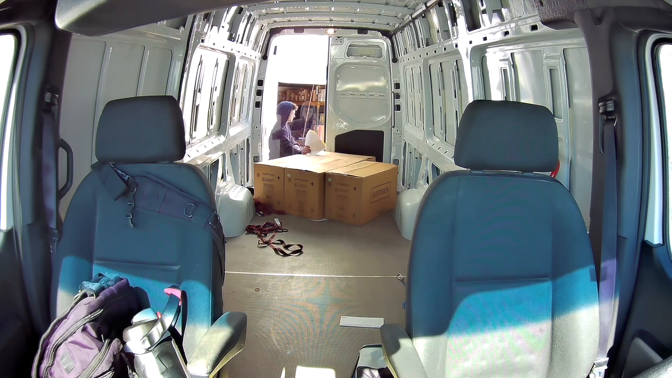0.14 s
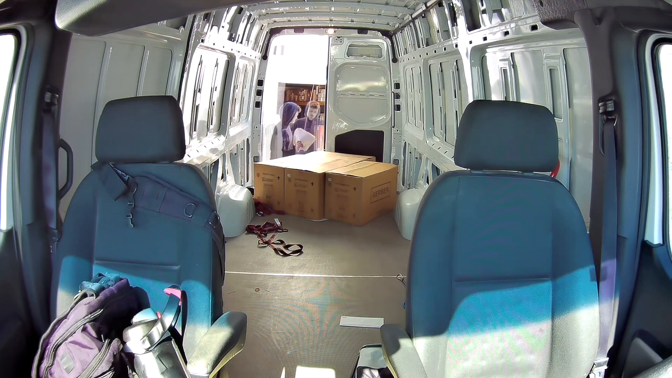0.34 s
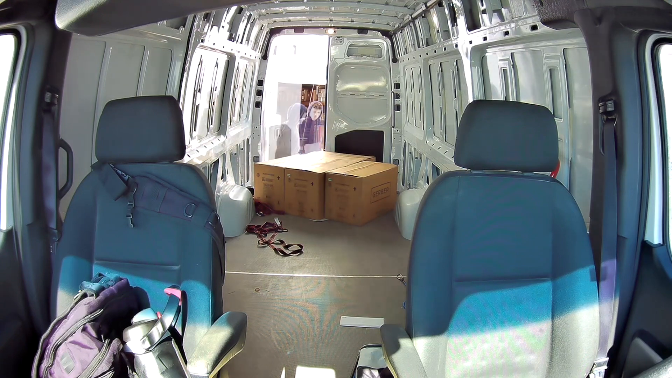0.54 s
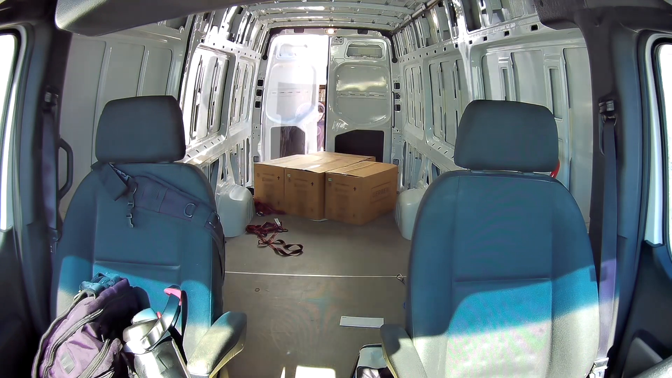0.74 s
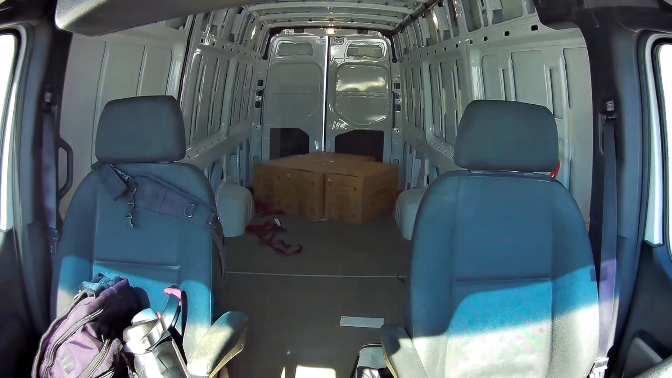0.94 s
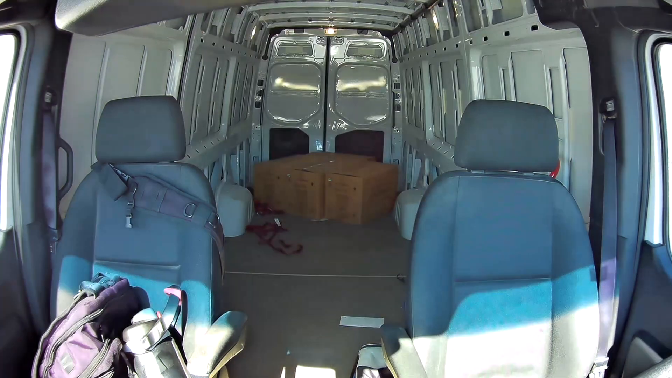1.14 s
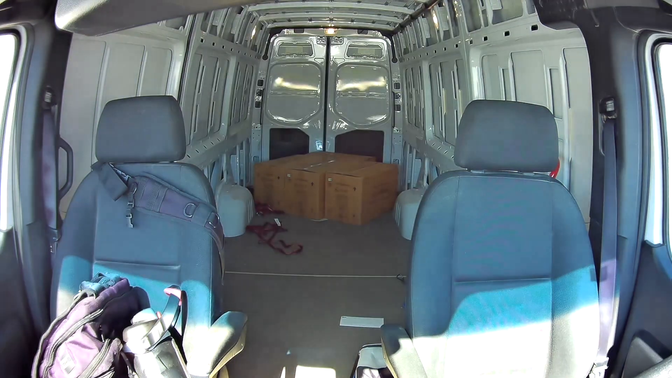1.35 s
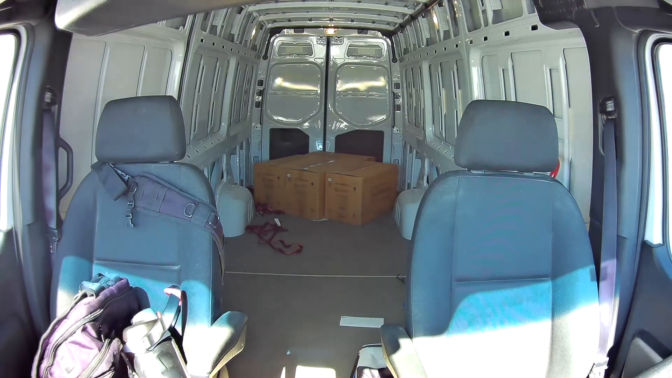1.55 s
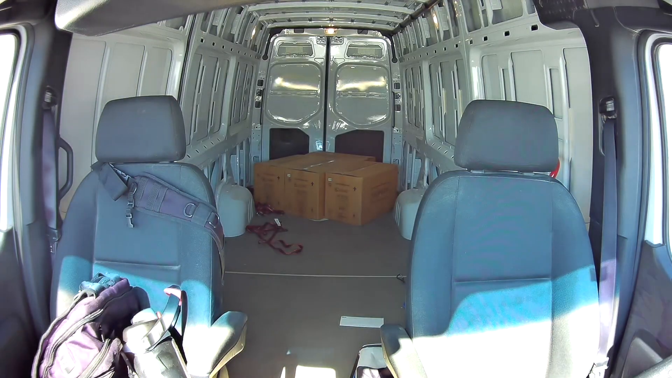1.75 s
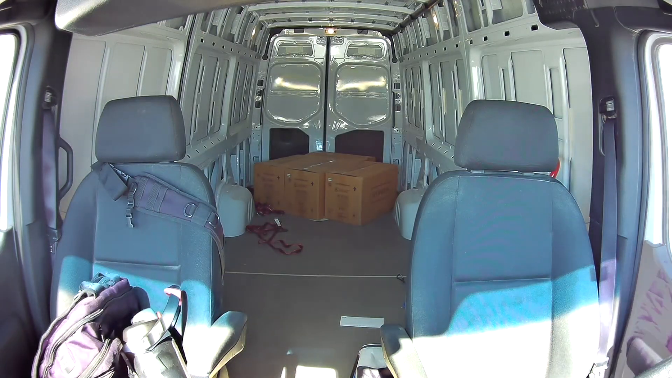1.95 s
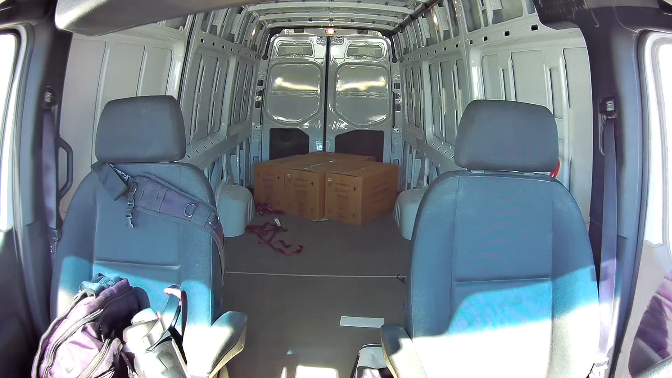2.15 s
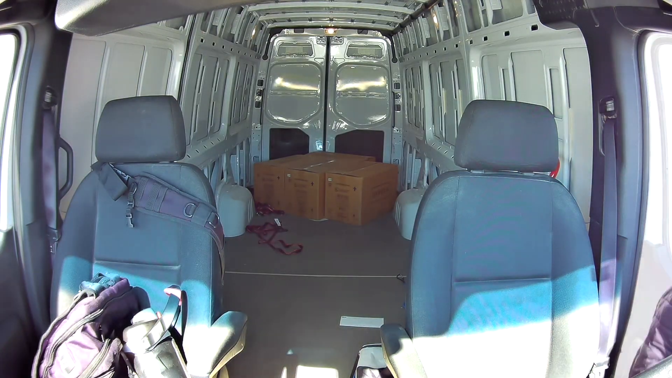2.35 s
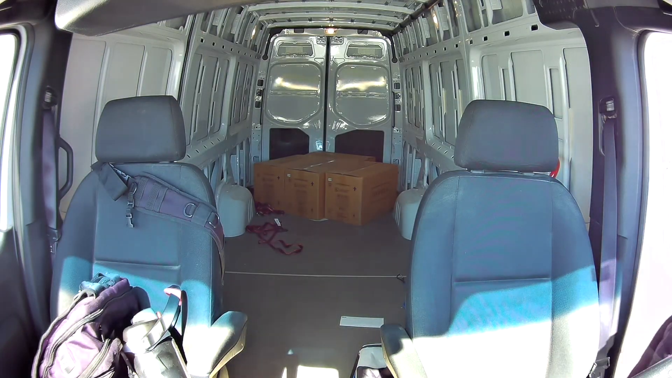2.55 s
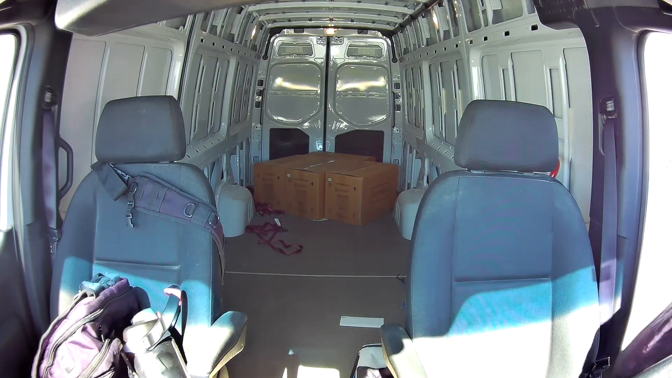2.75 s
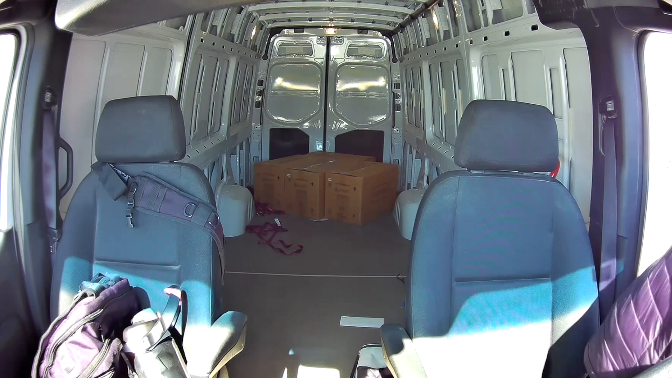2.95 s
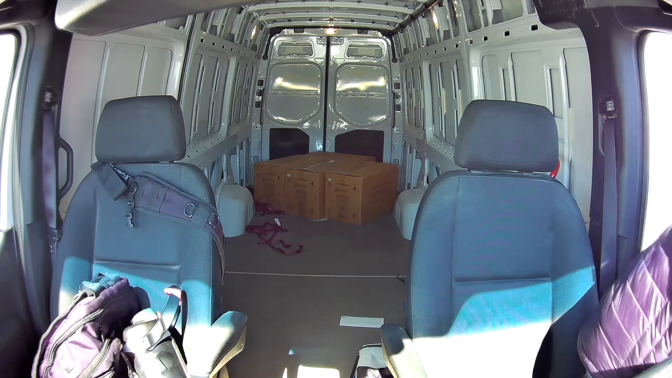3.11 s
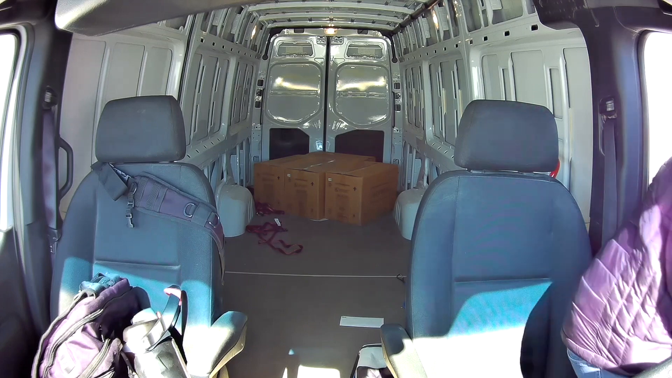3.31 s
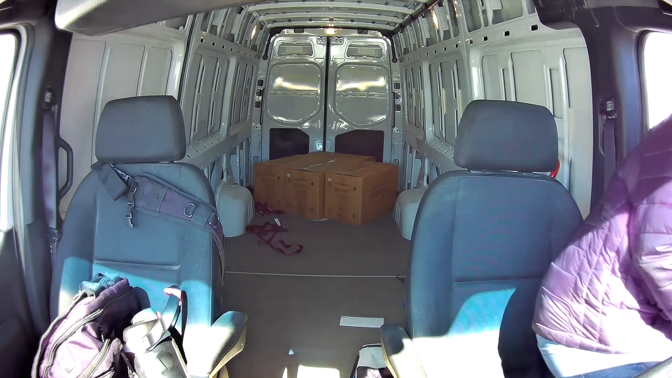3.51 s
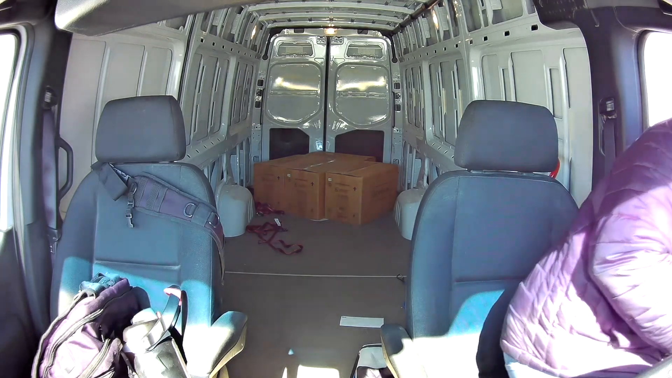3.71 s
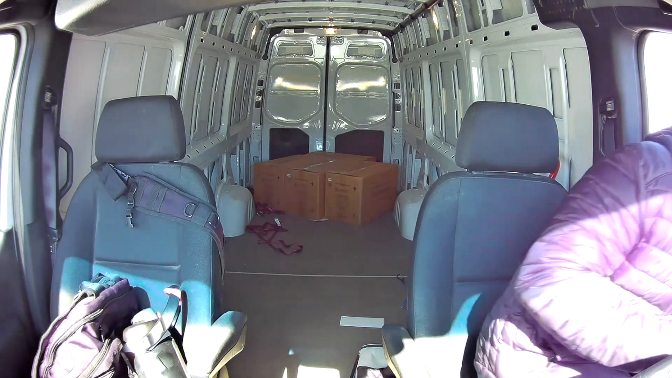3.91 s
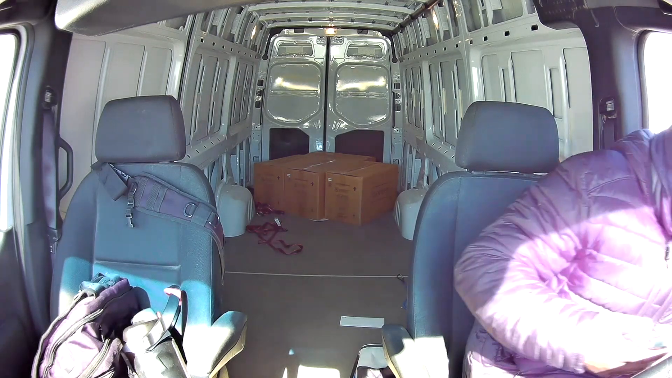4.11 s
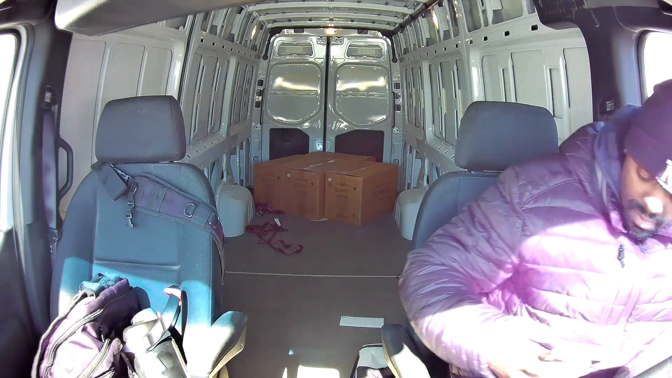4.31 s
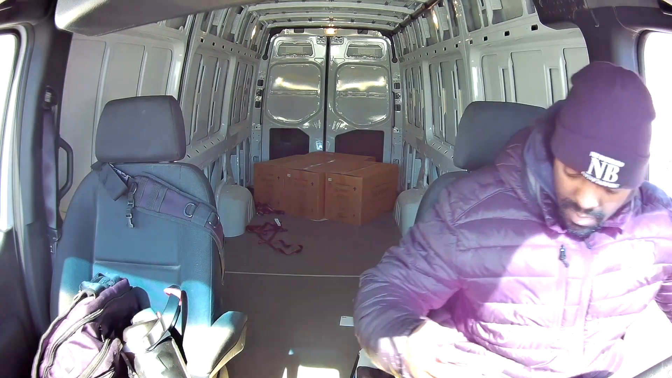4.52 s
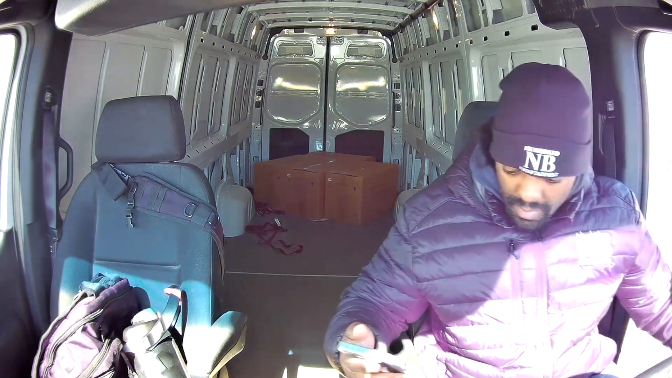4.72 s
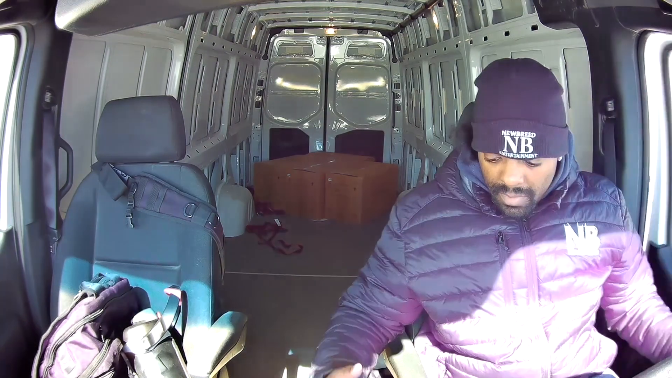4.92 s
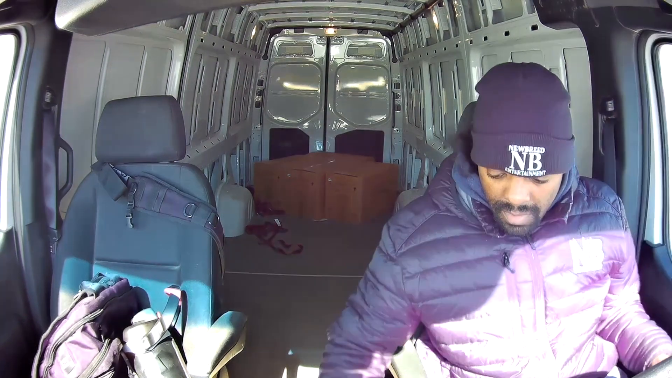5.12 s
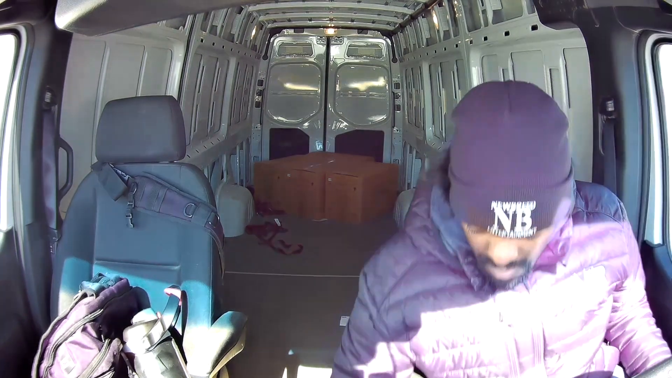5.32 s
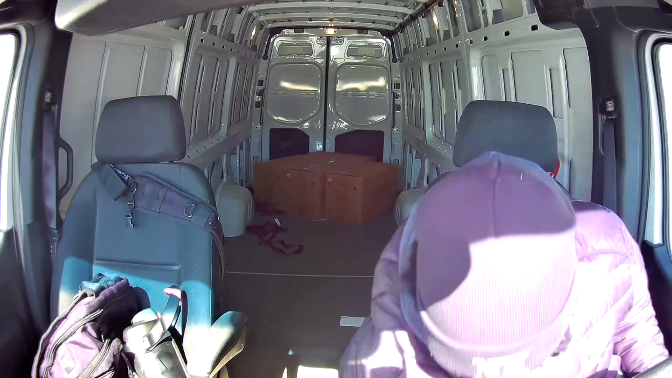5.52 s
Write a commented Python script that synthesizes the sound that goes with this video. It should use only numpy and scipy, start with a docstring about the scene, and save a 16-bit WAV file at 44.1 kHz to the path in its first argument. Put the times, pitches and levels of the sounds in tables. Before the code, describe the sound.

Inside a bare cargo van, heard from a small dashboard microphone. After a quiet low rumble and tiny ticks, the rear door slams at the far end, clattering and booming through the steel space. Quiet returns, then dull knocks as someone opens the cab and climbs in, with faint jacket rustle and bright metal ticks. The cab door slams close by, duller and with a shorter echo, followed by soft cloth movement.

```python
"""Van doors from the dashboard

Inside an empty cargo van, at a small dashboard camera: the far rear door slams and booms down the bare steel
load space, a few dull knocks open the cab, a padded jacket rustles, small metal parts tick, the near door slams.
Doors and knocks are damped body modes with noise; jacket, ticks and low rumble are shaped noise.
Sine tones make the faint hum, the air thumps, a thin squeak and a long after-ring; loud peaks are squeezed."""
import sys
import numpy as np
from scipy import signal
from scipy.fft import rfft, irfft
from scipy.io import wavfile
from scipy.ndimage import uniform_filter1d, map_coordinates

SR = 44100
rng = np.random.default_rng(int(sys.argv[2]) if len(sys.argv) > 2 else 0)


def transcribe(signal):
    """Save signal, clipped to [-1, 1], as a 16-bit WAV file at the path in sys.argv[1]."""
    frames = np.atleast_2d(signal).T
    limited = np.clip(frames, -1, 1)
    pcm = np.round(limited * 32767).astype(np.int16)
    wavfile.write(sys.argv[1], SR, pcm)


N = 245372  # length in samples


def amp(db):
    """Turns decibels into linear gain."""
    return 10 ** (np.asarray(db) / 20)


def unit(x):
    """Scales x to rms 1."""
    return x / np.sqrt(np.mean(x ** 2) + 1e-20)


def along(points, hz):
    """Reads (frequency, value) points at hz, in straight lines on a log frequency axis."""
    f, v = np.transpose(points)
    return np.interp(np.log(hz + 1), np.log(f + 1), v)


def curve(rows):
    """Draws one value per sample through (time, value) rows."""
    return np.interp(np.arange(N) / SR, *np.transpose(rows))


def wobble(rate):
    """Makes a smooth random curve with rate knots a second."""
    knots = rng.standard_normal(int(N * rate / SR) + 4)
    return map_coordinates(knots, [np.arange(N) * rate / SR])


def coloured(x, spectrum):
    """Filters noise x to a (frequency, level) spectrum and scales it to rms 1."""
    hz = np.fft.rfftfreq(len(x), 1 / SR)
    return unit(irfft(rfft(x) * amp(along(spectrum, hz)), len(x)))


def add(track, s, sound):
    """Mixes a sound into the track at s seconds."""
    track[round(s * SR):][:len(sound)] += sound


# Low rumble level before random drift: street, swelling with the long low tail of the slams
# and a seat movement: (time [s], level [dB])
RUMBLE_LEVEL = [(0, -59), (.34, -65.5), (1.4, -59), (2.2, -64.5), (2.7, -59.5), (3.5, -58), (4.8, -58.5),
                (5.3, -51), (5.56, -57.5)]
# Tone of the low rumble: (frequency [Hz], relative level [dB per Hz])
RUMBLE_TONE = [(12, -44), (25, -11.5), (41, -1.5), (62, -1.5), (85, -6.5), (154, -1.5), (274, -5.5),
               (361, -4.5), (510, -10), (790, -11), (900, -21), (1350, -19), (1750, -28.5), (3200, -31.5),
               (14500, -47.5)]
# Hum lines, around which pitch and level waver: (frequency [Hz], rms level [dB])
HUM_LINES = [(193, -80.5), (312, -74.5), (620, -77.5), (772, -73)]


def low_rumble():
    """Street, low slam tails and a seat movement: noise patchy in time and pitch, with thin wavering hum lines."""
    z = signal.stft(rng.standard_normal(N), nperseg=512)[2]
    patches = uniform_filter1d(rng.standard_normal(z.shape), 5, 0)  # smoothed across pitch
    patches = uniform_filter1d(patches, 8, 1)  # and along time
    noise = signal.istft(z * amp(1.56 * unit(patches)), nperseg=512)[1][:N]
    rumble = amp(curve(RUMBLE_LEVEL) + 0.93 * wobble(6.384)) * coloured(noise, RUMBLE_TONE)
    hum = np.zeros(N)
    for hz, db in HUM_LINES:
        level = np.sqrt(2) * amp(db + 1.1 * wobble(8.8))
        phase = 2 * np.pi * np.cumsum(hz + 2.3 * wobble(13)) / SR
        hum += level * np.sin(phase)
    return rumble + hum


# Jacket movements, before smoothing: (start of the hold [s], level [dB], hold [s])
JACKET_MOVES = [(0.074, -65.5, 0.028), (2.496, -74.5, 0.035), (2.83, -84, .02), (3.11, -70.5, 0.056),
                (4.073, -69.5, 0.028), (4.832, -81.5, 0.047), (5.307, -65, 0.17)]
# Tone of the padded cloth: (frequency [Hz], relative level [dB per Hz])
CLOTH_TONE = [(530, -4), (900, -9.5), (1550, -4.5), (2060, -17.5), (3270, -13.5), (3550, -19.5),
              (4800, -11), (6730, -21), (9110, -16.5), (12600, -26.5), (14500, -28)]
RUSTLE_RISE_DB_PER_S, RUSTLE_FALL_DB_PER_S = 130, 135
# faint steady hiss from the first knocks to the end
STEADY_START_S, STEADY_END_S, STEADY_DB = 2.5, 5.56, -77.5


def rustle():
    """Cloth sliding on cloth: grainy hiss swelling and fading at set rates, over a faint steady hiss."""
    t = np.arange(N) / SR
    grainy = rng.standard_normal(N) * amp(1.1 * wobble(240) + 0.15 * wobble(30))
    level = amp(STEADY_DB) * (t > STEADY_START_S) * (t < STEADY_END_S)
    for s, db, hold in JACKET_MOVES:
        rise_db = RUSTLE_RISE_DB_PER_S * np.maximum(s - t, 0)
        fall_db = RUSTLE_FALL_DB_PER_S * np.maximum(t - s - hold, 0)
        level = level + amp(db - rise_db - fall_db)
    return uniform_filter1d(level, 900) * coloured(grainy, CLOTH_TONE)  # 900 samples: about 20 ms


# Small hard ticks: (time [s], gain [dB], pitch [Hz], ring t60 [s], echo over the gain [dB])
TICK_EVENTS = [(.2600, -63.5, 1567, 0.09, 1.5), (.296, -65, 1480, 0.04, -10),
               (1.566, -72, 1334, 0.016, -20), (2.831, -66, 1440, .05, -10.5),
               (4.0366, -55.5, 6320, 0.051, -25), (4.0420, -50.5, 8760, .09, -21),
               (4.747, -64.5, 8740, 0.033, -0.5), (4.747, -58, 1370, 0.019, -10),
               (4.8475, -67.5, 7200, 0.052, -7), (5.2870, -69.5, 7060, 0.036, 8)]


def ticks():
    """Small metal parts: a brief narrow-band ring at the pitch, a wide snap and its echo in the van."""
    out, t = np.zeros(N + SR), np.arange(SR // 2) / SR
    for s, db, hz, t60, echo_db in TICK_EVENTS:
        band = [(hz * 0.5, -50), (hz * 0.97, -14), (hz, 0), (hz * 1.04, -14), (hz * 1.4, -50)]
        wide = [(hz * 0.46, -35), (hz * 0.58, -3), (hz * 0.56, -3), (hz * 1.8, -12),
                (hz * 2.9, -14), (hz * 4, -30), (hz * 9, -36)]
        ring = coloured(rng.standard_normal(len(t)), band) * amp(-60 * t / t60)
        echo_fall = amp(echo_db - 60 * t / (2.8 * t60))
        snap_fall = amp(-6.5 - 60 * t / 0.0092)
        spread = coloured(rng.standard_normal(len(t)), wide) * (echo_fall + snap_fall)
        add(out, s, amp(db) * (ring + spread))
    return out[:N]


def dying(spectrum, space):
    """One second of echo: each frequency dies at its own speed into a fainter, slower wash of treble."""
    hz, t, z = signal.stft(coloured(rng.standard_normal(SR), spectrum), SR, nperseg=512)
    wash_start_db = along([(1500, -43), (4000, -43), (10000, -32.5)], hz)[:, None]
    wash = amp(wash_start_db - 60 * t / 2.42)
    fall = amp(-60 * t / along(space, hz)[:, None])
    return signal.istft(z * (fall + wash), SR, nperseg=512)[1][:SR]


def door(hits, panel, clatter, space, ring_db, echo_db, blow_db, damping, rise, bright_rise,
         clatter_db, settle_db_per_s):
    """Each contact cracks, rings the panel modes anew and fills the steel box with dense echoes."""
    out, t = np.zeros(N + SR), np.arange(SR) / SR
    hz, level_db, t60 = np.transpose(panel)[:, :, None]
    dull = signal.butter(4, 1800, fs=SR, output="sos")
    bright = signal.butter(4, 1800, "high", fs=SR, output="sos")

    def swell(seconds):
        """An exponential onset."""
        return 1 - np.exp(-t / seconds)

    for s, boom_db, crack_db in hits:
        draw = rng.standard_normal((len(panel), 2))  # each contact excites and tunes the modes a little differently
        mode_hz = hz * (1 + 0.02047 * draw[:, 1:])
        modes = amp(level_db + 3.4 * draw[:, :1]) * np.sin(2 * np.pi * mode_hz * t)
        # a short punch of all modes, part of which rings on; high modes never ring long
        ring_t60 = np.minimum(damping * t60, 300 / hz + 0.18)
        ring_fall = amp(ring_db - 60 * t / ring_t60)
        blow_fall = amp(blow_db - 60 * t / 0.025)
        ring = (modes * (ring_fall + blow_fall)).sum(0) * np.sign(draw[0, 0])  # random polarity
        echo = dying(clatter, space)
        boom = (ring + amp(echo_db) * signal.sosfilt(dull, echo)) * swell(rise)
        # the bright part: a crack of metal on metal, then loose parts rattling unevenly
        rattle = amp(1.8 * wobble(120)[:SR]) * swell(bright_rise)
        crack = amp(crack_db - 60 * t / 0.056) * swell(0.003)
        shine = signal.sosfilt(bright, echo)
        shine = shine / shine[:SR // 20].std()  # levelled on its first 50 ms
        loose_db = boom_db + clatter_db - settle_db_per_s * (s - hits[0][0])  # later contacts rattle less
        add(out, s, amp(boom_db) * boom + amp(loose_db) * shine * (rattle + crack))
    return out[:N]


# Rear door contacts (seal, striker, latch, rebounds): (time [s], gain [dB], crack over the clatter [dB])
REAR_CONTACTS = [(.850, -33.5, -15), (.862, -8.5, -7), (.881, -8.5, 5.5), (.908, -13.5, -0.5),
                 (.938, -11, 4), (.952, -29, 18), (.996, -17, -2), (1.031, -20.5, 3), (1.064, -24.5, -5)]
# Rear panel modes, before random spread and damping: (frequency [Hz], level [dB], t60 [s])
REAR_MODES = [(176.7, -10.5, 0.9), (237, -8, 0.33), (343.2, 2, 0.65), (579.5, -0.5, 0.7), (818, -9, 0.14),
              (918, -10.5, 0.414), (1052, -9.5, 0.58), (1150, -14.5, 0.16), (1283, -11.5, 0.63),
              (1502, -16, 1.4), (1605, -32, 0.15)]
# Rear clatter tone: (frequency [Hz], relative level [dB per Hz])
REAR_TONE = [(15, -39), (30, -8), (103, -8.5), (170, -0.5), (275, -2.5), (340, -0.5), (506, -5),
             (679, -2.5), (886, -19), (1470, -19), (1900, -29), (2700, -26.5), (5000, -23.5), (6700, -35),
             (9500, -36.5), (14500, -59)]
# Echo decay of the bare load space: (frequency [Hz], t60 [s])
LOAD_SPACE_DECAY = [(30, 0.91), (150, 0.72), (500, 0.43), (2000, 0.43), (6000, 0.25), (13000, 0.35)]


def rear_door():
    """The far slam: panel modes and clatter with the long echo of the load space."""
    return door(REAR_CONTACTS, REAR_MODES, REAR_TONE, LOAD_SPACE_DECAY,
                ring_db=-15.5, echo_db=-7.5, blow_db=-9.5, damping=0.64, rise=0.0058,
                bright_rise=0.012, clatter_db=-24.5, settle_db_per_s=54.5)


AFTER_RING_HZ, AFTER_RING_DB, AFTER_RING_T60_S = 1240, -71, 8.0


def after_ring():
    """A thin panel singing on after the rear slam: one faint, long, wavering tone."""
    t = np.arange(N) / SR - REAR_CONTACTS[1][0]  # counted from the second contact
    level = amp(AFTER_RING_DB + 3.3 * wobble(20) - 60 * t / AFTER_RING_T60_S)
    phase = 2 * np.pi * np.cumsum(AFTER_RING_HZ + 3 * wobble(30)) / SR
    return (t > 0) * level * np.sin(phase)


# The air in the van pushed as a whole: (time [s], gain [dB], frequency [Hz])
AIR_THUMPS = [(.872, -20, 55), (.925, -27, 35.5), (2.456, -45.5, 69.4), (4.575, -47, 48),
              (4.957, -22.5, 60), (4.962, -13, 121.3)]
THUMP_T60_S = 0.29


def thumps():
    """Air pushed as a whole: a deep, quickly damped swing of pressure."""
    out, t = np.zeros(N + SR), np.arange(SR // 2) / SR
    for s, db, hz in AIR_THUMPS:
        onset = 1 - np.exp(-t / 0.01)
        add(out, s, amp(db - 60 * t / THUMP_T60_S) * np.sin(2 * np.pi * hz * t) * onset)
    return out[:N]


# Handle, feet and seat knocking the body: (time [s], gain [dB], pitch [Hz], t60 at the pitch [s])
BODY_KNOCKS = [(2.240, -48, 175, 0.073), (2.4490, -37, 408, 0.04), (2.4524, -30.5, 191, 0.18),
               (2.4580, -32.5, 269, 0.059), (3.065, -40.5, 199.6, 0.12), (3.110, -39, 176, 0.1),
               (3.318, -45, 151, 0.052), (3.588, -30.5, 247, 0.043), (4.058, -42.5, 200, 0.058),
               (4.075, -45, 228, 0.16), (4.588, -45, 185, 0.071), (4.766, -46, 297, 0.079),
               (4.890, -47, 159.5, 0.27)]
KNOCK_EDGE_DB = -7.5  # start of the woody edge under the ring


def knocks():
    """Soft blows on the body: a few low modes around the pitch and a short woody edge."""
    out, t = np.zeros(N + SR), np.arange(SR // 2) / SR
    # edge tone: (frequency [Hz], relative level [dB per Hz])
    edge_tone = [(120, -21), (250, 18.0), (700, -4.5), (900, -9.5),
                 (1600, -17), (1900, -28), (9000, -46), (14500, -44)]
    # modes: (ratio to the pitch, level [dB] before a random spread)
    modes = [(.8, -14.5), (1.0, -2.5), (1.75, -7.5), (2.6, -18), (4.1, -17.0), (7.6, -24)]
    for s, db, hz, t60 in BODY_KNOCKS:
        ring = np.zeros(len(t))
        for ratio, level_db in modes:
            fall_db = 60 * t * ratio ** 0.72 / t60  # higher modes die faster
            ring += amp(level_db + rng.normal(0, 1.0) - fall_db) * np.sin(2 * np.pi * hz * ratio * t)
        edge = coloured(rng.standard_normal(len(t)), edge_tone) * amp(KNOCK_EDGE_DB - 45 * t / t60)
        onset = 1 - np.exp(-t / 0.0022)
        add(out, s, amp(db) * (ring + edge) * onset)
    return out[:N]


# Cab door contacts (seal, striker, latch, rebounds): (time [s], gain [dB], crack over the clatter [dB])
CAB_CONTACTS = [(4.945, -35, 1), (4.956, -3, -1), (4.966, -10, 13), (5.002, -11.5, 4.5), (5.022, -12.5, -9),
                (5.052, -18.5, 8), (5.087, -22.5, -3)]
# Cab door modes, before random spread and damping: (frequency [Hz], level [dB], t60 [s])
CAB_MODES = [(119, 6.5, 0.2), (223, -12, 0.23), (271.2, -1.5, 0.55), (350, -1, 0.55), (418, -4, 0.2),
             (543, -21, 0.46), (619, 5, 0.11), (676.6, -7, 0.54), (776, -14, 0.59), (878, -7, 0.23),
             (980, -14, 0.18), (1060, -28, 0.27), (1146, -23, 0.36), (1150, -21, 0.39), (1390, -21.5, 0.59),
             (1373, -22, 0.58), (1460, -31, 0.54)]
# Cab clatter tone: (frequency [Hz], relative level [dB per Hz])
CAB_TONE = [(15, -38), (40, -5.5), (114, -4.5), (160, -1), (270, -1), (409, -4.5), (650, -11.5),
            (818, -17.5), (1390, -24.5), (2190, -40), (3400, -39.5), (5000, -36), (6700, -43.5),
            (9500, -45.5), (12700, -60), (14500, -78)]
# Echo decay around the cab door: (frequency [Hz], t60 [s])
CAB_SPACE_DECAY = [(30, 0.67), (150, 0.48), (500, 0.36), (2000, 0.38), (6000, 0.18), (13000, 0.25)]


def cab_door():
    """The near slam: a faster boom, a slower-swelling, duller clatter and a shorter echo."""
    return door(CAB_CONTACTS, CAB_MODES, CAB_TONE, CAB_SPACE_DECAY,
                ring_db=-14.5, echo_db=-11.5, blow_db=-10, damping=0.6, rise=0.0021,
                bright_rise=0.026, clatter_db=-31, settle_db_per_s=10)


SQUEAK_START_S, SQUEAK_END_S = 5.235, 5.51
SQUEAK_START_HZ, SQUEAK_GLIDE_HZ_PER_S, SQUEAK_DB = 3190, 550, -81


def squeak():
    """A faint thin squeak: a wavering tone that glides up and fades in and out."""
    t = np.arange(N) / SR
    fade = np.clip(np.minimum(t - SQUEAK_START_S, SQUEAK_END_S - t) / 0.027, 0, 1)
    pitch = SQUEAK_START_HZ + SQUEAK_GLIDE_HZ_PER_S * (t - SQUEAK_START_S) + 12 * wobble(60)
    tone = np.sqrt(2) * np.sin(2 * np.pi * np.cumsum(pitch) / SR)
    return fade * amp(SQUEAK_DB + 2.7 * wobble(40)) * tone


def scene():
    """Sums every source at the dashboard into one channel."""
    quiet_layers = low_rumble() + rustle() + ticks()
    rear_slam = rear_door() + after_ring()
    cab_sounds = knocks() + cab_door() + squeak()
    return (quiet_layers + rear_slam + thumps() + cab_sounds)[None]


# Tone of the microphone's own noise: (frequency [Hz], relative level [dB per Hz])
HISS_TONE = [(500, -32.5), (1500, 8.5), (3200, -6.5), (5000, -7.5), (6800, -7), (9000, -4), (11000, -6),
             (12500, -6), (14500, -13)]
HISS_DB, PEAK_CEILING, TOP_HZ = -80, 0.52, 14500  # rms level, linear ceiling of the rounding, band limit


def record(dry):
    """The camera adds its hiss, rounds off the loudest peaks and keeps nothing above its band limit."""
    heard = dry + amp(HISS_DB) * coloured(rng.standard_normal(N), HISS_TONE)
    soft = heard / (1 + np.abs(heard / PEAK_CEILING) ** 4) ** (1 / 4)
    in_band = np.fft.rfftfreq(N, 1 / SR) < TOP_HZ
    return irfft(rfft(soft) * in_band, N)


dry = scene()
out = record(dry)
transcribe(out)
```